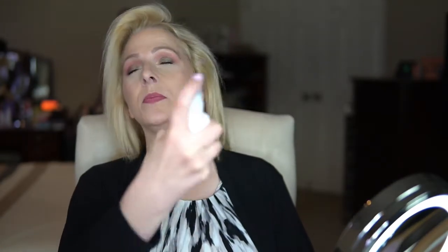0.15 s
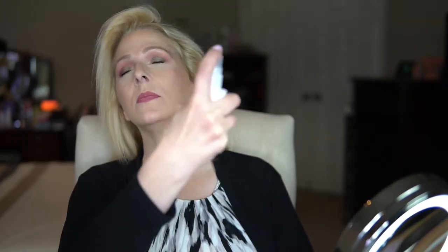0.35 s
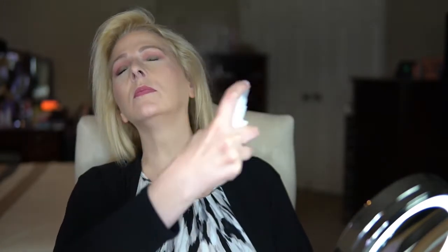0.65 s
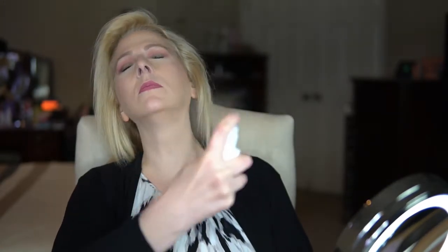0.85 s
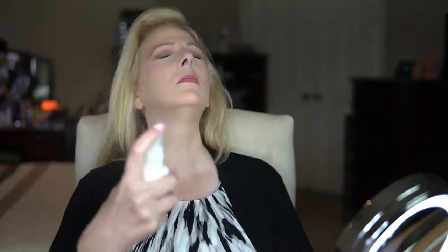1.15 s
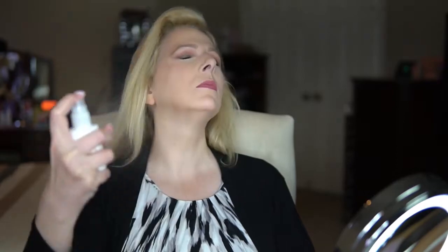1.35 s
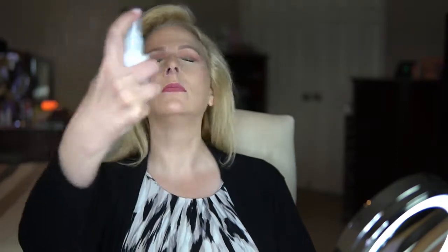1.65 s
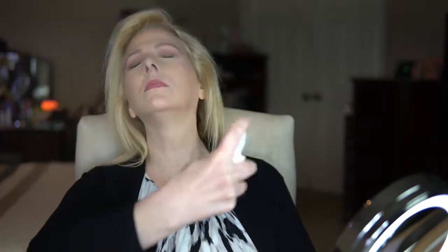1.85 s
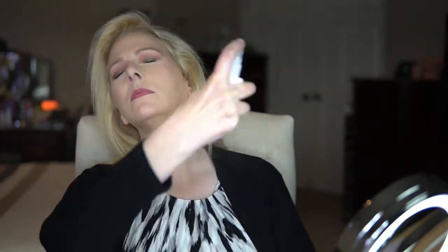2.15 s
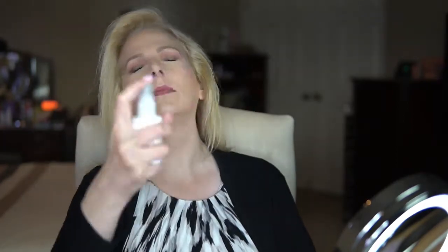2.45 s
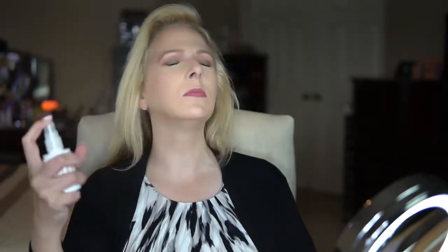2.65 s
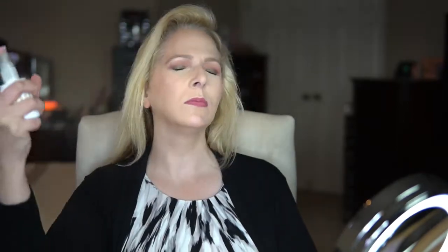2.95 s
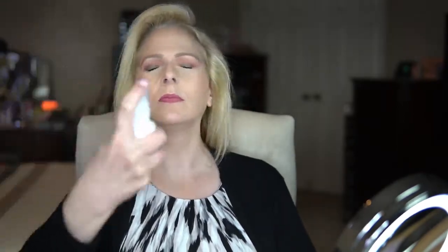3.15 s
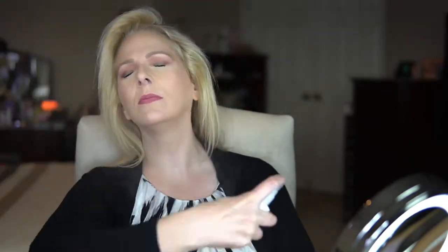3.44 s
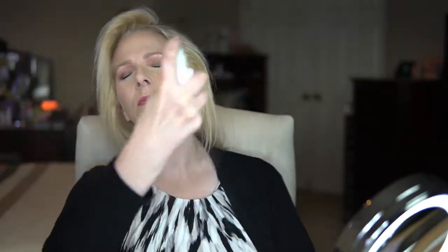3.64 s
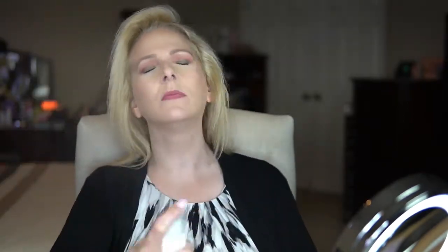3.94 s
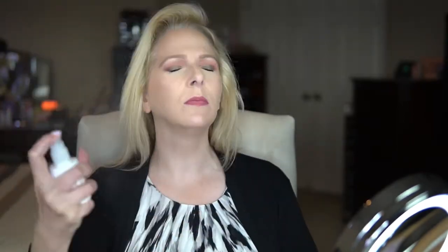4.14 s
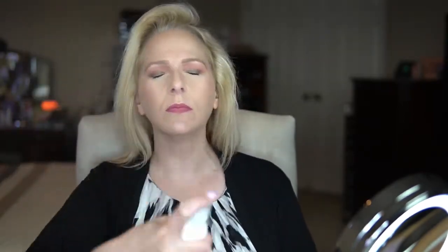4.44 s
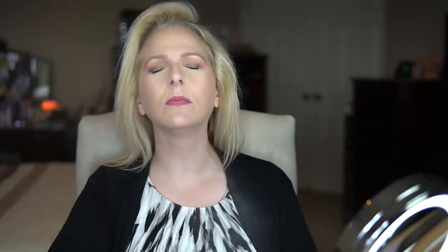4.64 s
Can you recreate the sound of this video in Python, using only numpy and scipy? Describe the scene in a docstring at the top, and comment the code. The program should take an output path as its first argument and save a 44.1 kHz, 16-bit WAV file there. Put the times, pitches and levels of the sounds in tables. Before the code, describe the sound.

A small finger-pump bottle spritzes seventeen quick, short hisses with plastic clicks and tiny valve pings, close up in a quiet, low-humming room.

```python
"""Finger-pump bottle sprayed in a quiet room

Seventeen presses close to a microphone, heard in mono. Each press excites the plastic pump's damped modes
and drives a turbulent jet, shaped noise with a narrower hiss band near 3 kHz. On release the head knocks
back, the piston scrapes as a gliding rough tone, and the valve ball pings as decaying sines while the
chamber refills. Fine rattle, appliance hum and rumble, and a short noise-tail reverberation complete it."""
import sys
import numpy as np
from scipy import signal
from scipy.fft import rfft, irfft
from scipy.io import wavfile
from scipy.ndimage import uniform_filter1d

SR = 44100
rng = np.random.default_rng(int(sys.argv[2]) if len(sys.argv) > 2 else 0)


def file_out(sig):
    """Save sig as 16-bit WAV at sys.argv[1]."""
    # one column per channel
    cols = np.atleast_2d(sig).T
    # limit, then scale
    lim = np.clip(cols, -1, 1)
    pcm = np.round(lim * 32767).astype(np.int16)
    wavfile.write(sys.argv[1], SR, pcm)


N = 211350  # samples

# Presses: click t/s, click level/dB, thud level/dB, finger landing level/dB, jet start t/s, jet length t/s,
# jet peak level/dB, opening level re peak/dB, band level re jet/dB, treble gain at peak pressure/dB
PRESSES = [(0.5274, -17.5, -20, -41, 0.5245, 0.089, -25, -4.5, -0.5, 1.5),
           (0.7565, -19, -22, -33, 0.779, 0.092, -24, -6, 0, 0),
           (0.994, -17, -22, -30, 1.0105, 0.091, -23, -5.5, 0, 1),
           (1.235, -27, -29.5, -23, 1.259, 0.092, -24.5, -6, -3, 0),
           (1.4615, -20, -22, -33, 1.484, 0.091, -24, -7, -1, 0.5),
           (1.715, -32, -22, -18, 1.728, 0.093, -23, -10, -1, 3),
           (1.979, -20, -27, -22.5, 2.0, 0.09, -24, -6.5, -2, -0.5),
           (2.242, -8.5, -25, -15.5, 2.255, 0.091, -22.5, -8, 0, 1.5),
           (2.5033, -10.5, -20, -17, 2.522, 0.09, -22.5, -5.5, -2, 0.5),
           (2.7689, -7, -25, -23, 2.779, .09, -23.5, -5, -2, 2),
           (3.001, -12.5, -23.5, -18.5, 3.016, 0.094, -23, -8, -4, -0.5),
           (3.2534, -7.5, -24, -19, 3.27, 0.089, -23, -7, -1, 0),
           (3.5087, -12.5, -24, -27, 3.527, 0.094, -23.5, -7, -3.5, -0.5),
           (3.753, -9.5, -24, -21, 3.77, 0.092, -23.5, -9.5, -1, 2),
           (4.0204, -8, -20, -19.5, 4.0315, .088, -22, -9, -3.5, 2.5),
           (4.2901, -5.5, -21.5, -18.5, 4.3, .088, -22, -8.5, -1.5, 2.5),
           (4.5613, -4, -21.5, -21.5, 4.567, 0.092, -22.5, -9.5, -4.5, 1.5)]
# Spectral density of the jet hiss: f/Hz, relative level per Hz/dB
JET_SPECTRUM = [(410, -27), (700, -14.5), (971, -12.5), (1210, -11), (1520, -8.5), (1840, -10.5),
                (3030, -3), (4050, -5.5), (12000, -17), (14400, -18), (16000, -26)]
# Narrow hiss band near 3 kHz, perhaps the microphone's resonance: f/Hz, width of one filter pass f/Hz,
# relative level/dB
BAND_MODES = [(2360, 1070, -6), (3025, 290, 1), (3390, 620, 1)]
# Refills: valve ball t/s, ping peak level/dB, ping f/Hz, tick level before decay/dB, piston scrape level/dB,
# scrape length t/s
REFILLS = [(0.6912, -25.5, 2890, -49, -43, 0.036), (0.9433, -22, 2910, -49, -35.5, .035),
           (1.174, -26, 2866, -41, -35, .032), (1.416, -24, 2790, -46, -38, 0.044),
           (1.6563, -19.5, 2820, -45, -37, .035), (1.915, -11.5, 2960, -47, -36, 0.03),
           (2.1822, -9.5, 2945, -49, -41, 0.031), (2.4389, -6, 2903, -43, -37, 0.03),
           (2.7005, -8.5, 2950, -33, -35, 0.016), (2.9495, -10.5, 2960, -34, -44, .035),
           (3.1935, -8, 2900, -32, -39, 0.022), (3.4506, -11.5, 2910, -42, -46, .035),
           (3.7107, -19, 3000, -36, -47, 0.018), (3.9581, -5.5, 2910, -46, -34, 0.021),
           (4.227, -8, 2846, -35, -32.5, 0.018), (4.4905, -7, 2915, -48, -53, 0.026),
           (4.7506, -22, 3070, -33, -44, 0.02), (4.7585, -19, 3010, -47, -45, .01)]
# The head springs back or the grip shifts: t/s, peak level/dB, favoured f/Hz, hollow bottle thud level/dB
RELEASE_KNOCKS = [(0.6589, -31, 1000, -23.5), (0.9096, -26, 1580, -23), (1.1414, -30, 1000, -24.5),
                  (1.1501, -18, 2180, -27), (1.174, -32, 2800, -23), (1.347, -1.5, 2130, -25),
                  (1.3826, -22, 1930, -25), (1.417, -30, 2800, -17.5), (1.6255, -29, 2130, -18.5),
                  (1.6543, -26, 2800, -21.5), (1.881, -15, 2180, -19), (2.1512, -27, 2190, -22.5),
                  (2.1612, -14.5, 2070, -26), (2.4027, -24, 1450, -20), (2.6647, -26, 1320, -24.5),
                  (2.9105, -25, 1840, -29), (3.1539, -23, 2160, -27), (3.166, -14, 2210, -43),
                  (3.4144, -27, 2200, -30), (3.6814, -17, 2020, -25), (3.6864, -6, 2110, -35),
                  (3.923, -23.5, 1310, -36), (4.1915, -21, 2160, -23), (4.4511, -14, 1840, -45),
                  (4.454, -15, 2240, -47), (4.7196, -16, 1720, -31)]
# Modes of the plastic pump before detuning: f/Hz, relative level/dB, 60 dB decay t/s
PUMP_MODES = [(796, -7, 0.041), (1052, 6.5, 0.014), (1560, 7.5, 0.0081), (1925, 12.5, 0.0048),
              (2200, 6, 0.0083), (2505, -2.5, 0.019), (3430, -25, 0.027)]
# Wavering appliance tones: f/Hz, skirt width f/Hz, nominal level/dB
HUM_TONES = [(49.8, 12, -40.5), (117.4, 14.3, -35), (238.8, 4.5, -50.5)]
# Reverberation time of the room: f/Hz, 60 dB decay t/s
ROOM_DECAY = [(300, 0.29), (2000, 0.32), (6000, 0.39), (15000, 0.21)]
# Spectral density of the ventilation noise: f/Hz, relative level per Hz/dB
AIR_SPECTRUM = [(20, -10), (53, -4.5), (81, -11.5), (127, -5), (241, -17.5), (388, -19), (527, -22),
                (850, -28), (1030, -21.5), (1370, -31.5), (2200, -36.5), (3400, -37), (5500, -56),
                (15000, -57)]

AIR_DB, TAIL_DB = -32, -9
CLICK_HZ, CLICK_THUD_HZ = 2590, 395  # the pressing hand holds the bottle tighter
THUD_HZ, THUD_T60_S, GRIP_SPREAD = 459, 0.03, 0.11  # the grip moves the bottle's pitch from blow to blow
LANDING_LEAD_S, LANDING_THUD_DB = 0.0059, -4  # the finger lands before the click; thud re its tap
CRACK_DB, CRACK_PER_DB = -8.5, 6.5  # steep growth: only hard blows crack audibly
BUILD_S, SAG_DB, SHUT_S = 0.045, -2.5, 0.006  # pressure opens low, builds, sags, shuts off
BAND_PER_DB = 0.7  # the narrow band swells less than the jet
BAND_WANDER_DB, TREBLE_PER_DB = 2, 0.1  # the band comes and goes; treble grows with pressure
SLIDE_PER_S, SLIDE_TO = 7.0, 0.93  # scrape climb and end, as shares of the ping pitch
SUCK_S, SUCK_TO, SUCK_DB = 0.0558, 0.9, -40  # chatter after the ping: length, end pitch share, level re ping
PING_T60_S = 0.015
CEILING, EDGE_HZ = 0.85, 15800  # clipping amplitude, upper band limit


def amp(db):
    """Amplitude is ten to the power of level over twenty."""
    return 10 ** (np.asarray(db) / 20)


def evened(x):
    """Normalisation to unit rms fixes the mean power."""
    return x / np.sqrt(np.mean(x ** 2) + 1e-20)


def read(points, hz):
    """Linear interpolation on a log-frequency axis."""
    f, value = np.transpose(points)
    return np.interp(np.log(hz + 1), np.log(f + 1), value)


def add(mix, s, sound):
    """Superposition of a sound on the mix from time s."""
    part = mix[round(s * SR):][:len(sound)]
    part += sound[:len(part)]


def coloured(points):
    """Spectral weighting turns white noise into steady coloured noise."""
    spectrum = rfft(rng.standard_normal(N))
    gain = amp(read(points, np.fft.rfftfreq(N, 1 / SR)))
    return irfft(spectrum * gain, N)


def resonate(x, hz, width):
    """A two-pole resonance passes its centre frequency with unit gain."""
    return signal.lfilter(*signal.iirpeak(hz, hz / width, SR), x)


def lumps(seconds):
    """A moving average of white noise gives slow random fluctuation of unit rms."""
    return evened(uniform_filter1d(rng.standard_normal(N), max(round(seconds * SR), 2)))


def ring(modes, rise, gains_db=0):
    """Modal superposition: detuned damped sines struck together, scaled to unit peak."""
    hz, db, t60 = np.transpose(modes)[:, :, None]
    t = np.arange(2600) / SR
    hz = hz * (1 + 0.02 * rng.standard_normal(hz.shape))  # detuned a little by the grip
    decay = amp(db + gains_db - 60 * t / t60)
    x = (decay * np.sin(2 * np.pi * hz * t)).sum(0)
    x = x * (1 - np.exp(-t / rise)) ** 2
    return x / abs(x).max()


def tick():
    """Impact of plastic on plastic: a broadband treble burst decaying in milliseconds."""
    t = np.arange(500) / SR
    crack = resonate(resonate(rng.standard_normal(len(t)), 9000, 7000), 8500, 9000)
    return evened(crack) * amp(-60 * t / 0.0096) * (1 - np.exp(-t / 0.0005))


def patchy(x, depth_db):
    """Random modulation of the short-time spectrum lets the colour drift in patches of time and pitch."""
    z = signal.stft(x, nperseg=256)[2]
    over_pitch = uniform_filter1d(rng.standard_normal(z.shape), size=7, axis=0)
    patches = evened(uniform_filter1d(over_pitch, size=6, axis=1))
    return evened(signal.istft(z * amp(depth_db * patches), nperseg=256)[1][:N])


def room_tone():
    """Broadband ventilation noise with appliance tones, each a steady sine in a narrow-band noise skirt."""
    out, t = amp(AIR_DB) * evened(coloured(AIR_SPECTRUM)), np.arange(N) / SR
    for hz, width, db in HUM_TONES:
        skirt = evened(resonate(rng.standard_normal(N), hz, width))
        core = np.sin(2 * np.pi * (hz * t + rng.random()))
        out += amp(db) * (0.64 * skirt + 0.9 * core)
    return out


def knocks():
    """Impact excitation: each blow favours nearby pump modes and thuds the bottle at a grip-dependent pitch."""
    out, mode_hz = np.zeros(N), np.array(PUMP_MODES)[:, :1]
    clicks = [(s, db, CLICK_HZ, thud_db, CLICK_THUD_HZ) for s, db, thud_db, *_ in PRESSES]
    landings = [(s - LANDING_LEAD_S, db, CLICK_HZ, db + LANDING_THUD_DB, THUD_HZ)
                for s, _, _, db, *_ in PRESSES]
    releases = [(*row, THUD_HZ) for row in RELEASE_KNOCKS]
    for s, db, centre_hz, thud_db, thud_hz in clicks + landings + releases:
        thud_hz = thud_hz * np.exp(GRIP_SPREAD * rng.standard_normal())
        octaves_off = abs(np.log2(mode_hz / centre_hz))
        add(out, s, amp(db) * ring(PUMP_MODES, 0.00031, -10.0 * octaves_off))
        thud_modes = [(thud_hz, 0, THUD_T60_S), (thud_hz * 1.29, -7, 0.025)]
        add(out, s - 0.001, amp(thud_db) * ring(thud_modes, 0.00053))
        add(out, s, amp(CRACK_PER_DB * db + CRACK_DB) * tick())
    return out


def sprays():
    """Pressure-driven turbulence: broad hiss and a narrower band, both sputtering as droplets break off."""
    jet, band_level, bright_db = np.zeros(N), np.zeros(N), np.zeros(N)
    for *_, s, length, jet_db, open_db, band_db, aim_db in PRESSES:
        u = np.arange(0, length, 1 / SR)
        pressure_db = np.interp(u, [0, BUILD_S, length], [open_db, 0, SAG_DB])
        level = amp(jet_db + pressure_db) * np.minimum((length - u) / SHUT_S, 1)
        add(jet, s, level)
        add(band_level, s, level * amp(band_db + (BAND_PER_DB - 1) * pressure_db))
        add(bright_db, s, aim_db + TREBLE_PER_DB * pressure_db)
    noise, band = rng.standard_normal(N), np.zeros(N)
    for k, (hz, width, db) in enumerate(BAND_MODES):
        mode = resonate(resonate(noise, hz, width), hz, width)
        band += amp(db) * mode * (-1) ** k  # alternating sign
    hiss = patchy(coloured(JET_SPECTRUM), depth_db=1.35)
    treble = signal.sosfiltfilt(signal.butter(2, 8500, "high", fs=SR, output="sos"), hiss)
    hiss += (amp(bright_db) - 1) * treble
    hiss *= amp(1.0 * lumps(0.00234) + 1.5 * lumps(0.01))
    band = evened(band) * amp(1.6 * lumps(0.0029) + BAND_WANDER_DB * lumps(0.025))
    # 110 samples of smoothing soften the edges of each spray
    return uniform_filter1d(jet, 110) * hiss + uniform_filter1d(band_level, 110) * band


def room(x):
    """Frequency-dependent reverberation: the moving bottle feeds three decaying noise tails in turn."""
    out, turn = np.zeros(N), np.arange(N) / SR / 0.11  # half turns
    for k in range(3):
        hz, t, z = signal.stft(rng.standard_normal(SR // 2), SR, nperseg=256)
        decay = amp(-60 * t / read(ROOM_DECAY, hz)[:, None])
        tail = signal.istft(z * decay, SR, nperseg=256)[1]
        tail = np.r_[np.zeros(220), tail] / np.linalg.norm(tail)  # 5 ms before the first reflection
        share = np.sqrt(2 / 3) * np.cos(np.pi * (turn + k / 3))  # the three powers sum to one
        out += signal.fftconvolve(x * share, tail)[:N]
    return out


def rattle():
    """Random impulses excite single pump modes, with low finger-rub noise, from the first press onward."""
    size = amp(5.57 * np.minimum(rng.exponential(1, N), 3))
    size = size * (rng.random(N) < 220 / SR)  # on average 220 ticks a second
    held = np.arange(N) > PRESSES[0][0] * SR
    which, ticks = rng.integers(0, len(PUMP_MODES), N), np.zeros(N)
    for k, mode in enumerate(PUMP_MODES):
        response = amp(mode[1]) * ring([mode], 0.00021)
        ticks += signal.oaconvolve(size * (which == k), response)[:N]
    rubs = evened(resonate(rng.standard_normal(N), 450, 300) * amp(12.0 * lumps(0.016)))
    return held * (amp(-52.0) * ticks + amp(-48.5) * rubs)


def scrapes():
    """Stick-slip of the piston seal roughens a tone that glides as the chamber changes."""
    out = np.zeros(N)
    slides = [(s - length, length, (SLIDE_TO - SLIDE_PER_S * length) * hz, SLIDE_TO * hz, db)
              for s, _, hz, _, db, length in REFILLS]
    # after the ping a faint rough tone trails on and its pitch sinks
    sucks = [(s, SUCK_S, hz, SUCK_TO * hz, db + SUCK_DB) for s, db, hz, *_ in REFILLS]
    for s, length, from_hz, to_hz, db in slides + sucks:
        n = round(length * SR)
        slips = resonate(rng.standard_normal(n), 87, 155)  # a wavering, rough envelope
        turns = np.cumsum(np.linspace(from_hz, to_hz, n)) / SR + rng.random()
        rough_tone = evened(slips * np.sin(2 * np.pi * turns))
        add(out, s, amp(db) * rough_tone * signal.windows.tukey(n, 0.4))
    return out


def valve():
    """Damped vibration of the ball on its seat: three modes swell and decay, with a tick and a faint knock."""
    out, t = np.zeros(N), np.arange(2000) / SR
    swell = (1 - np.exp(-t / 0.00092)) ** 2
    for s, db, hz, tick_db, *_ in REFILLS:
        phase = rng.random(2)  # cycles, for the side modes
        ping = amp(-60 * t / PING_T60_S) * np.sin(2 * np.pi * hz * t)
        ping += amp(-8.5 - 60 * t / 0.015) * np.sin(2 * np.pi * (hz * 1.1 * t + phase[0]))
        ping += amp(-0.5 - 60 * t / 0.007) * np.sin(2 * np.pi * (hz * 0.854 * t + phase[1]))
        ping *= swell
        add(out, s - 0.0005, amp(db) * ping / abs(ping).max())
        add(out, s, amp(db - 19.0) * ring(PUMP_MODES, 0.0003))
        add(out, s, amp(tick_db) * tick())
    return out


def scene():
    """Superposition of direct sound, reverberation and room tone, equal in both channels."""
    jet, pings, pump = sprays(), valve(), knocks() + rattle() + scrapes()
    wet = room(jet + amp(-2.0) * pings + amp(0.5) * pump)
    mono = jet + pings + pump + amp(TAIL_DB) * wet + room_tone()
    return np.array([mono, mono])


def record(dry):
    """Hard clipping limits the strongest peaks; a linear-phase low-pass then bounds the band."""
    clipped = np.clip(dry, -CEILING, CEILING)
    lowpass = signal.firwin(511, EDGE_HZ, window=("kaiser", 9), fs=SR)
    return signal.oaconvolve(clipped, lowpass[None], "same")


dry = scene()
out = record(dry)
file_out(out)
```